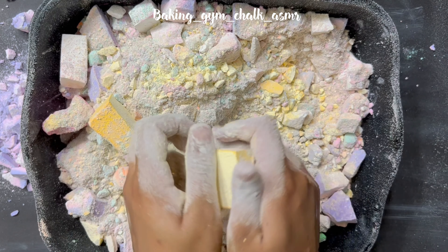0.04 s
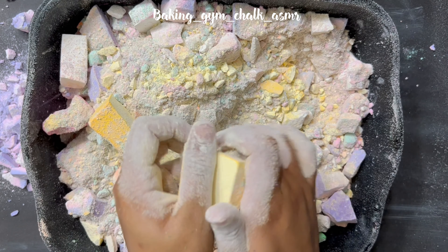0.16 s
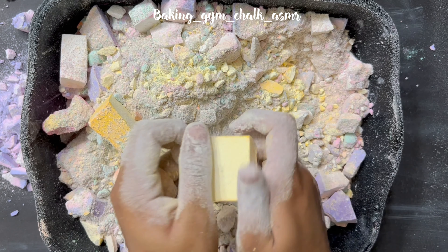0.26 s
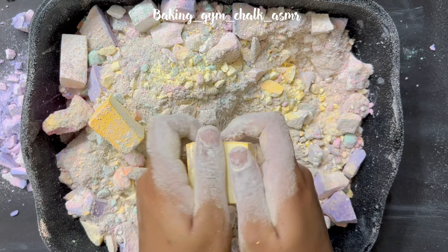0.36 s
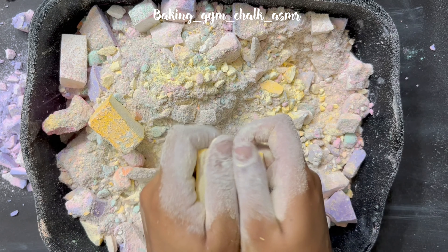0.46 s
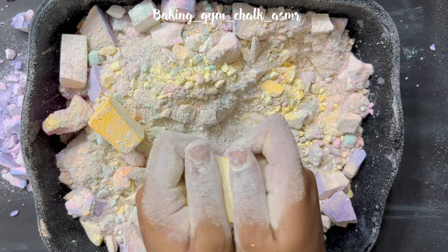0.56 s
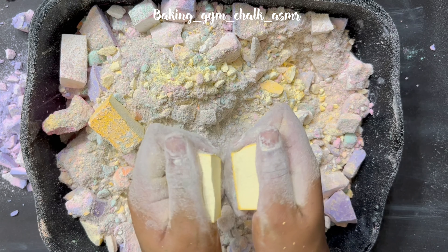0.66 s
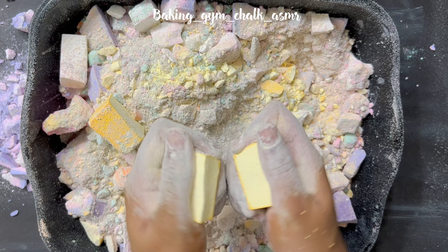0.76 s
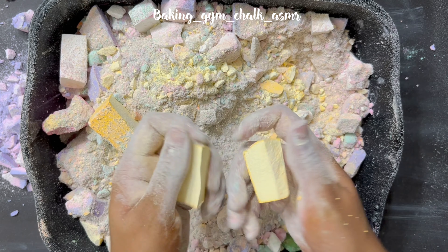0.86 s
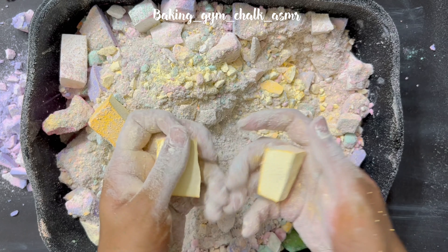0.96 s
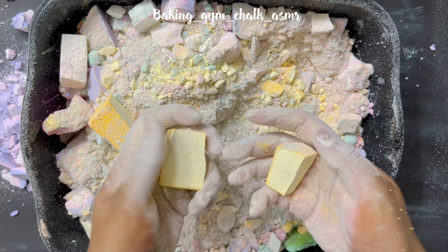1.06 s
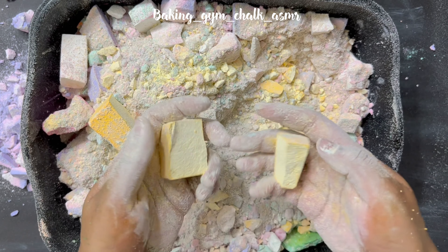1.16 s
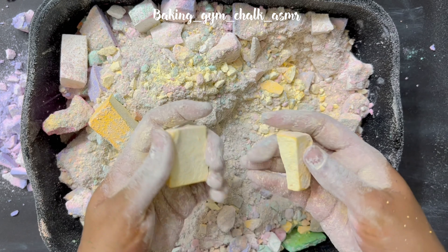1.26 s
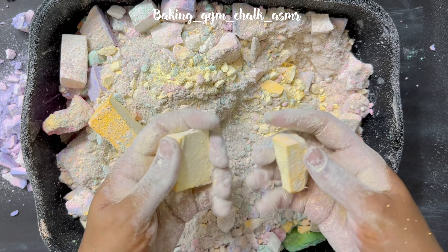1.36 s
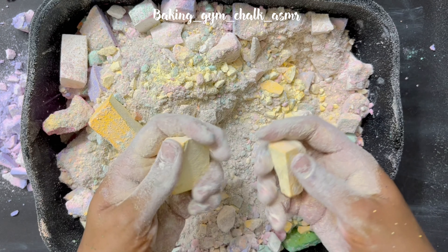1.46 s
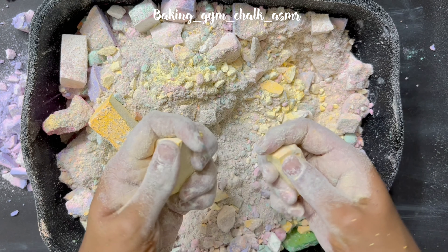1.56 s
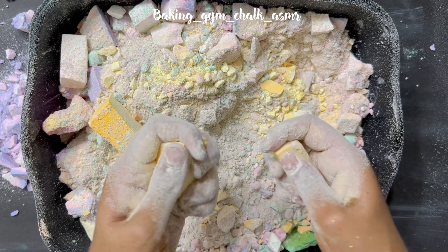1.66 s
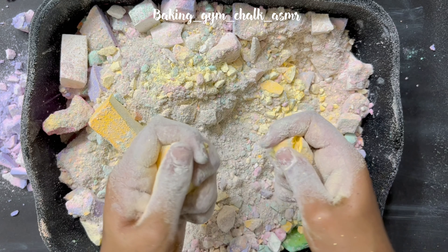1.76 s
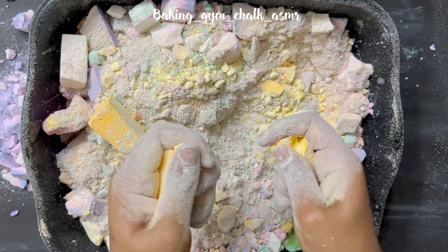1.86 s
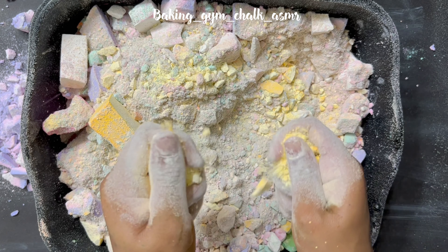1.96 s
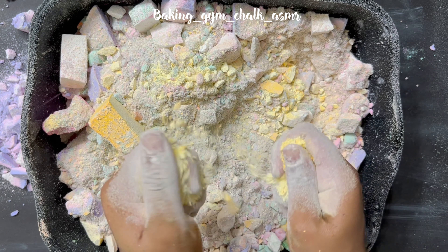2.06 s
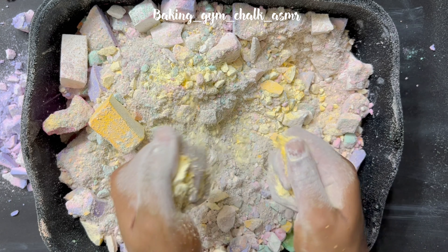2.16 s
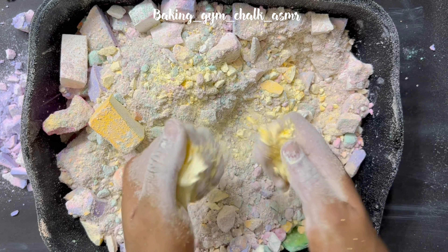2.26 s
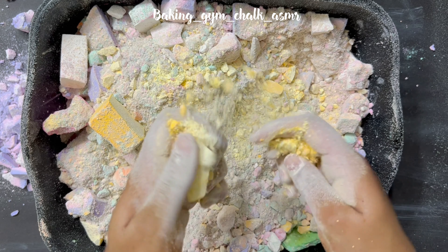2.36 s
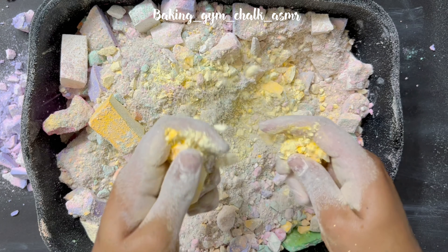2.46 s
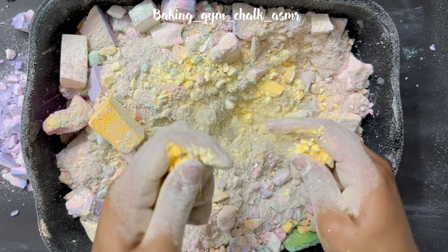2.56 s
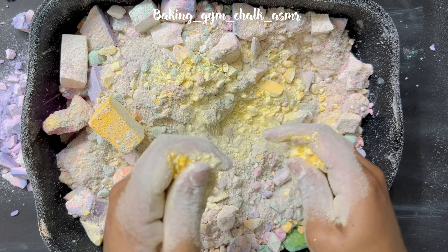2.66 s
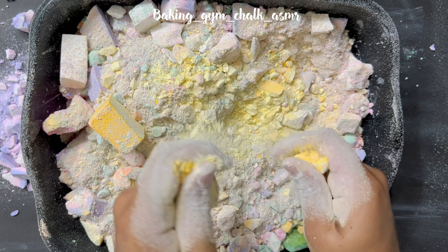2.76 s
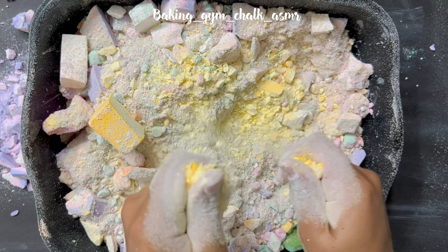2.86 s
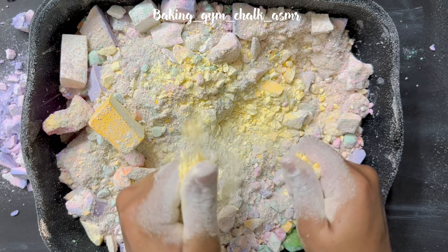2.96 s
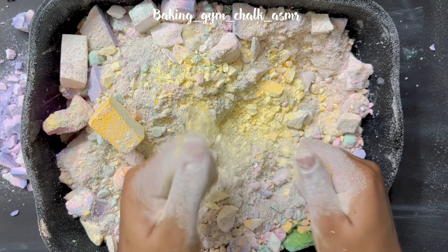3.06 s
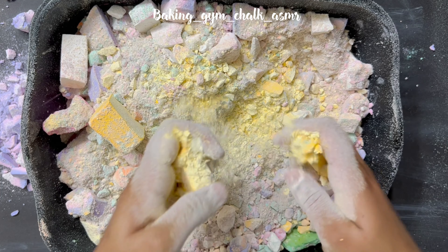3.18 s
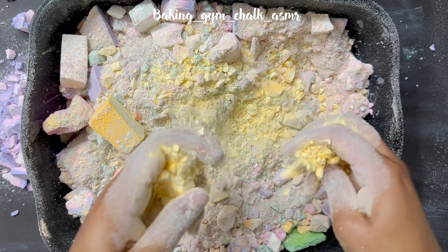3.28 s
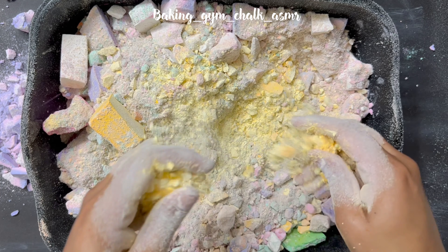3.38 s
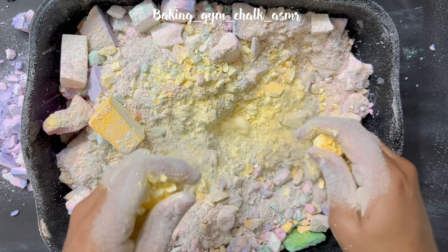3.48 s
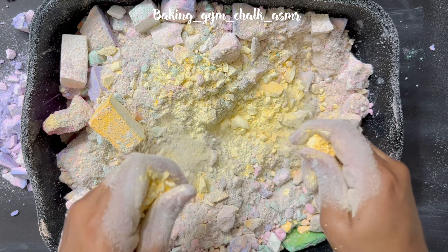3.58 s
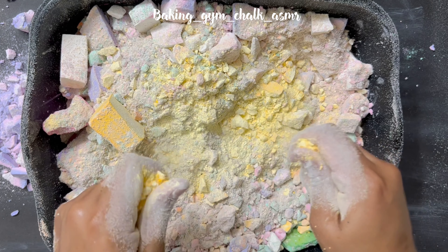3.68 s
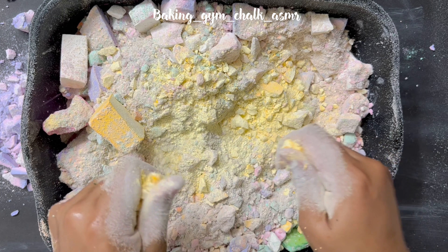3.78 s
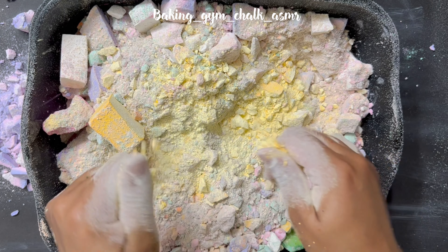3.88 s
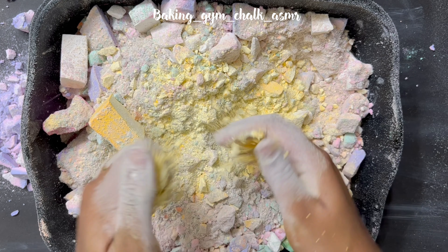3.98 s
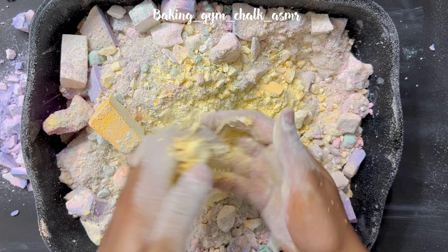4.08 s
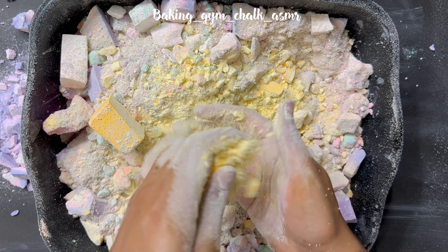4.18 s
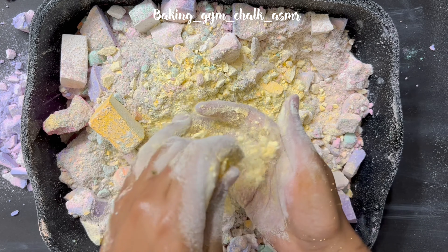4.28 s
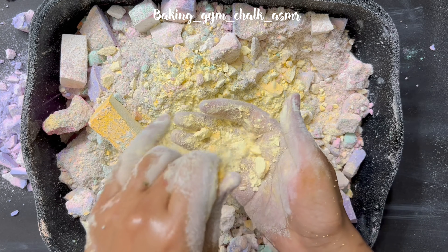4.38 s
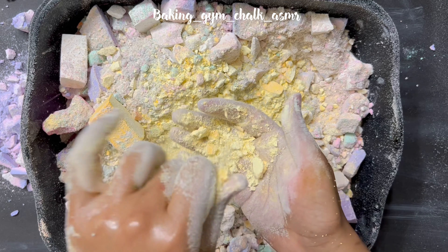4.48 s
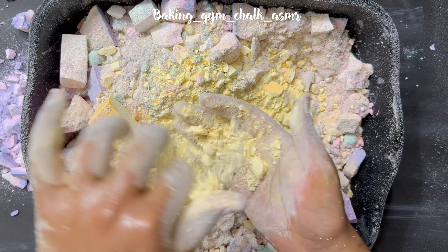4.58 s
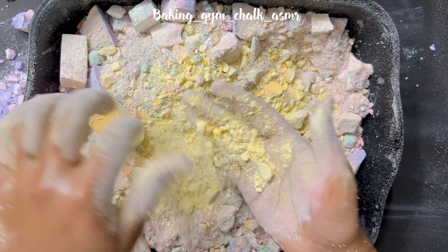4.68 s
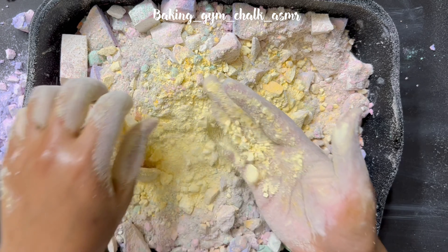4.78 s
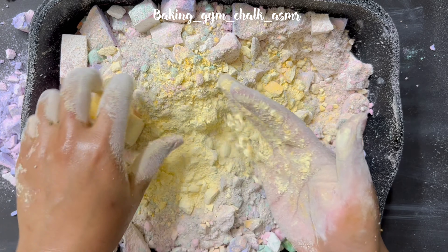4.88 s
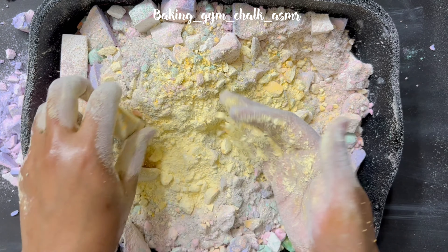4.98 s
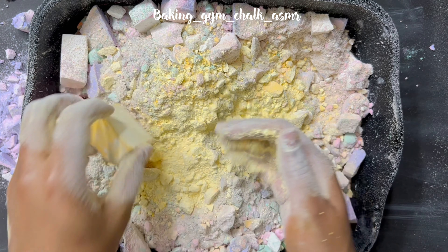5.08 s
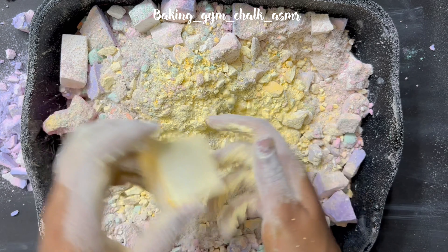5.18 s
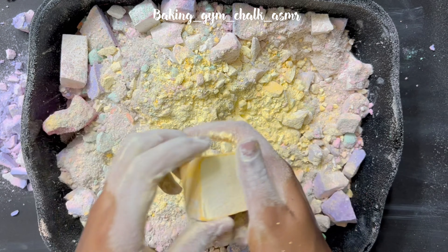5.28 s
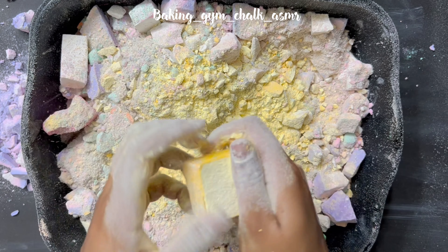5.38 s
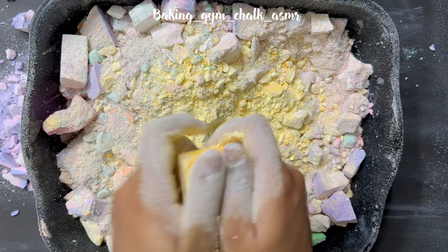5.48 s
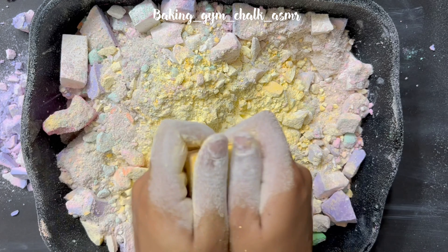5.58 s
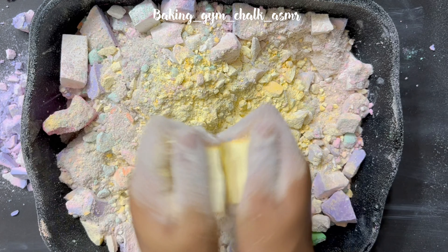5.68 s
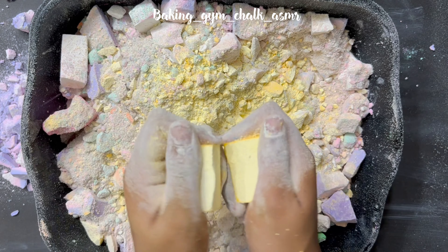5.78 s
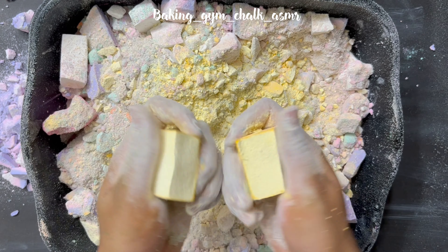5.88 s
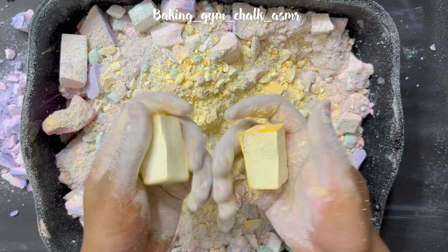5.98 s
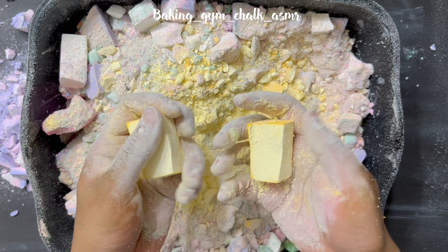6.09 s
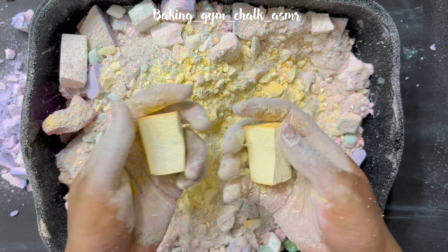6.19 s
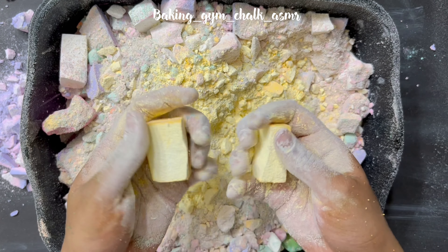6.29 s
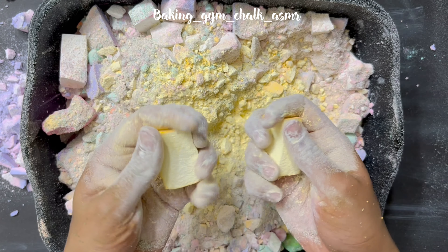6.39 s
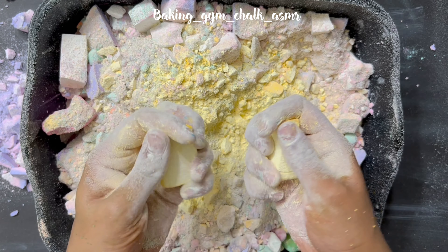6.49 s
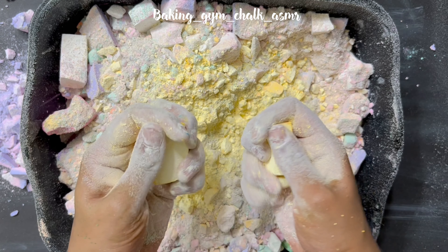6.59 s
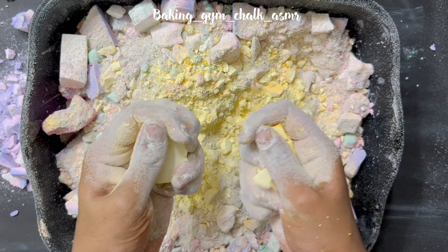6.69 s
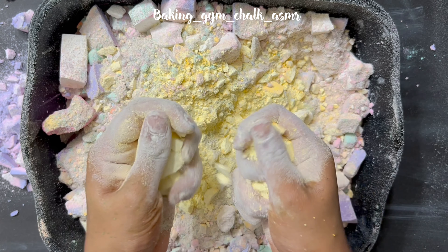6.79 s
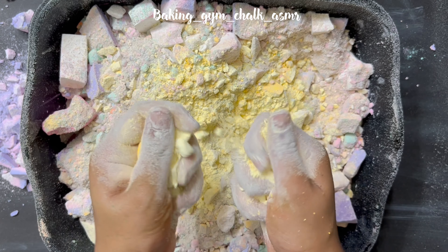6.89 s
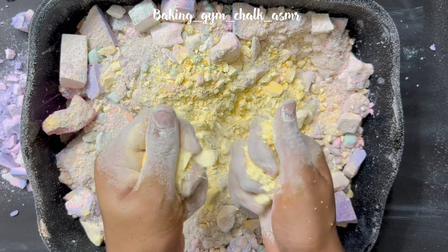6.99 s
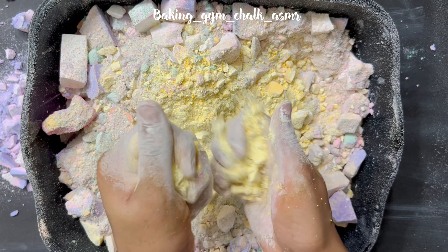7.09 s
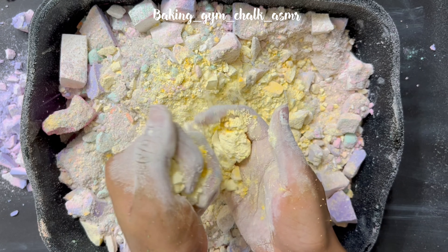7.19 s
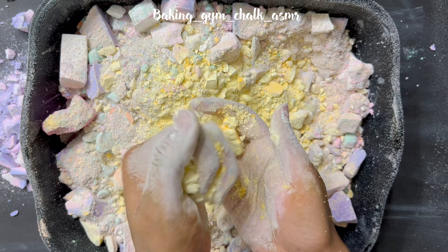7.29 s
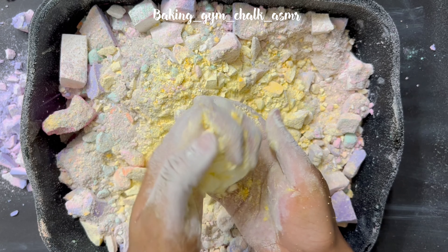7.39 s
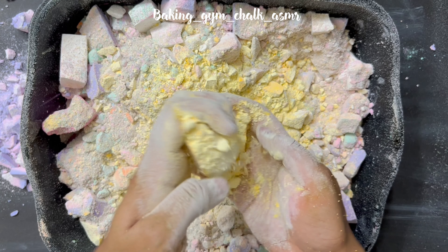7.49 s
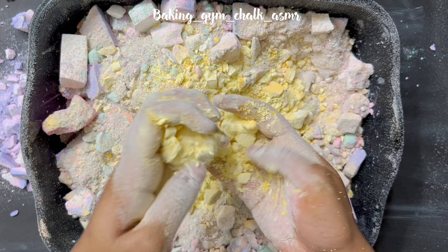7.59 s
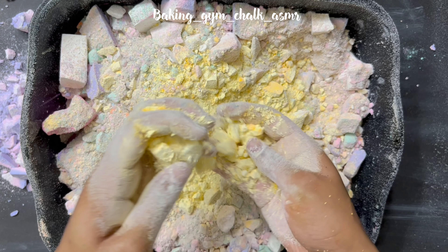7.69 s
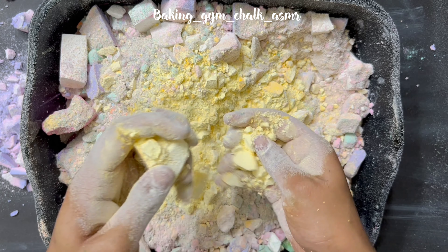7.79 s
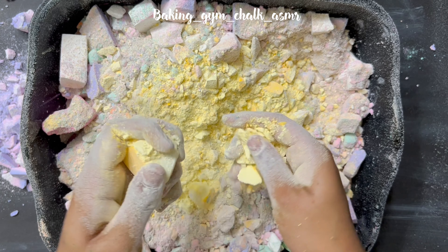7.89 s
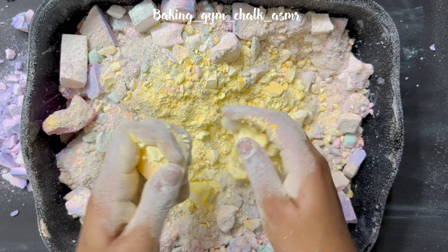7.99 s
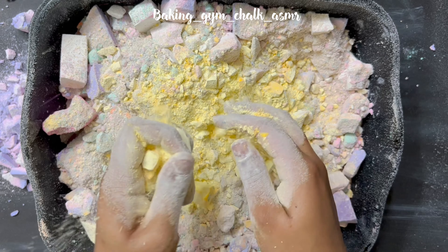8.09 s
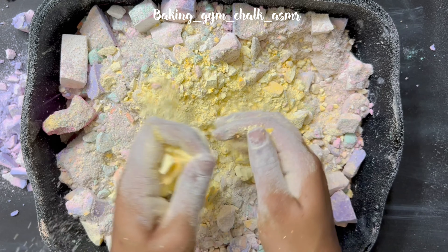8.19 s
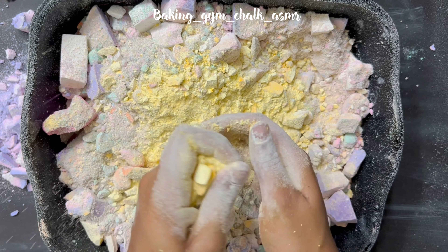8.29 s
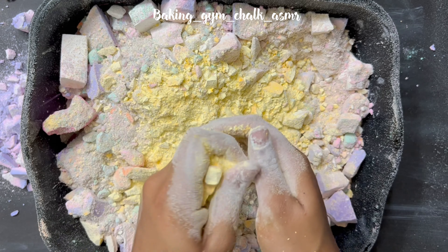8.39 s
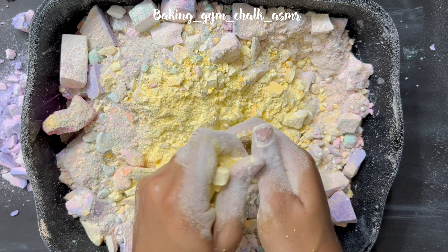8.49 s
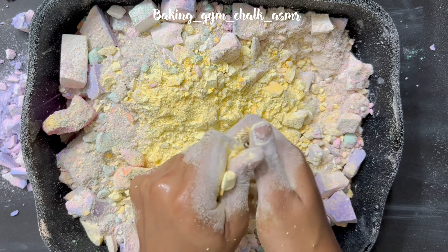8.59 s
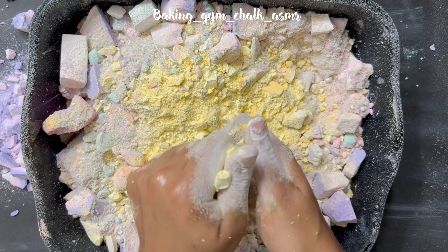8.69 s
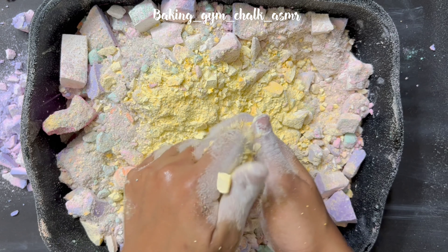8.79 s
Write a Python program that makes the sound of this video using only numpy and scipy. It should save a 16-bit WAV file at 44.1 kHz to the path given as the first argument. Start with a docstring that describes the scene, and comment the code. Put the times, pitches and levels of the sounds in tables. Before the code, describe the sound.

Hard chalk snaps sharply in two, crunches into crisp irregular crackles and powdery crumbs, with whispery rubbing between, very close in a quiet room.

```python
"""Dusty fingers swish over soft chalk, close by in a small room, before one hard snap.
Swishes lead into a dense volley of breaks that thins into crumbs; a lone snap and a second volley
follow, then scattered breaks to the end. Each break is a tick whose lows trail after it.
Noise grains make the crumbs and swishes; a short tail answers over faint hum, rumble and hiss.
The loudest snaps clip."""
import sys
import numpy as np
from scipy import signal
from scipy.fft import rfft, irfft
from scipy.io import wavfile
from scipy.ndimage import uniform_filter1d

SR = 44100
rng = np.random.default_rng(int(sys.argv[2]) if len(sys.argv) > 2 else 0)


def unload_audio(sound):
    """Save the sound as a 16-bit wav file, at the path given as the first command line argument."""
    columns = np.transpose(np.atleast_2d(sound))
    # keep every value between -1 and 1, then stretch to whole-number steps
    steps = np.round(np.clip(columns, -1, 1) * 32767)
    wavfile.write(sys.argv[1], SR, steps.astype(np.int16))


N = 390285  # length in samples


def undb(db):
    """Decibels to gain."""
    return 10 ** (np.asarray(db) / 20)


def unit(x):
    """Scale to rms 1."""
    return x / np.sqrt(np.mean(x ** 2))


def columns(table):
    """Automation curves from a table whose first column is time, one value per sample."""
    s, *cols = np.transpose(table)
    return [np.interp(np.arange(N) / SR, s, c) for c in cols]


def colour(x, gain):
    """Filter with a gain given as a function of frequency."""
    n = x.shape[-1]
    f = np.arange(n // 2 + 1) * SR / n + 1e-3
    return irfft(rfft(x) * gain(f), n)


def points(table):
    """EQ curve through (frequency, level) points on a log-frequency axis."""
    hz, db = np.transpose(table)
    return lambda f: undb(np.interp(np.log(f), np.log(hz), db))


def band(x, lo_hz, hi_hz):
    """Causal band-pass."""
    sos = signal.butter(2, [lo_hz, min(hi_hz, .45 * SR)], "band", fs=SR, output="sos")
    return signal.sosfilt(sos, x)


def walk(rate):
    """Random modulation, rms 1, that glides to a new value rate times a second."""
    k = int(SR / rate)
    steps = np.repeat(rng.standard_normal(N // k + 1), k)
    return unit(uniform_filter1d(steps, k)[:N])


def wide(likeness, size):
    """Stereo noise whose left and right correlate by the given likeness."""
    mid, side = rng.standard_normal((2, size))
    c = np.clip(likeness, -1, 1)
    return np.sqrt((1 + c) / 2) * mid + np.sqrt((1 - c) / 2) * side * np.array([[1], [-1]])


def swells(table):
    """Bell-shaped swells of gain for two layers; the length spans the 1/e points."""
    t, out = np.arange(N) / SR, np.zeros((2, N))
    for s, *db, ms in table:
        near = slice(max(int((s - ms / 500) * SR), 0), int((s + ms / 500) * SR))
        bell = np.exp(-(2000 * (t[near] - s) / ms) ** 2)
        out[:, near] += undb(db)[:, None] * bell
    return out


def crackle(rate, spread_db):
    """Lone clicks at random moments (rate per second), a few much larger than the rest."""
    chance, size, sign = rng.random((3, N))
    return (chance < rate / SR) * undb(-spread_db * np.log(1 - size)) * np.sign(sign - .5)


HISS_DB = -72


def hiss():
    """Microphone hiss: steady, partly shared band-passed noise."""
    return undb(HISS_DB) * unit(band(wide(0.45, size=N), 1500, 15000))


# partials of the hum: (frequency [Hz], relative level [dB])
HUM_PARTIALS = [(65.5, -4.5), (131, 1), (197, -5), (333, -13.5)]


def hum(hum_db):
    """Sine partials sharing one slight pitch waver, each with its own level waver."""
    hum_db = hum_db + 1.7 * walk(6.5)
    turns = np.cumsum(1 + .006 * walk(7.4)) / SR
    tone = 0
    for hz, db in HUM_PARTIALS:
        level = undb(db + 2.0 * walk(14)) * np.sqrt(2)
        tone = tone + level * np.sin(2 * np.pi * hz * turns)
    return undb(hum_db) * tone


RUSTLE_DB = -63.5  # mean level of the low rustle between scuffs
# spectrum behind rumble and rustle: (frequency [Hz], relative level [dB per Hz])
RUMBLE_SPECTRUM = [(12, -27), (20, -5), (132, -5), (236, -16.5), (270, -11.5), (315, -21), (396, -15.5),
                   (509, -19.5), (908, -25), (2000, -36.5), (2600, -62), (4400, -120)]
# low bumps and scuffs of hands and lumps in the tub:
# (centre time [s], rumble level [dB], rustle level [dB], length [ms])
TUB_SCUFFS = [(.42, -57.5, -61, 110), (.63, -55, -51, 100), (1.76, -60.5, -53.5, 69), (1.9, -54.5, -63, 70),
              (2.32, -56, -59, 39), (2.63, -57, -66, 67), (2.72, -53, -37, 17), (2.81, -58, -52, 55),
              (3.49, -65, -38, 25), (3.57, -56.5, -58, 80), (4.86, -61.5, -48, 64), (4.96, -60, -57.5, 84),
              (5.03, -51.5, -64, 50), (5.49, -47, -71, 63), (5.7, -41.5, -47, 72), (6.72, -56, -49, 54),
              (7.02, -58, -70, 60), (8.04, -54, -48, 31), (8.18, -61, -66, 84)]


def rumble_and_rustle(rumble_db):
    """Low-passed noise under a wide low rustle; bumps and scuffs in the tub swell both."""
    rumble_db = rumble_db + 2.2 * walk(6)
    rustle_db = RUSTLE_DB + 1.9 * walk(6.3)
    bump, scuff = swells(TUB_SCUFFS)
    low_pass = signal.butter(2, 170, fs=SR, output="sos")
    rumble = signal.sosfilt(low_pass, colour(wide(0.93, size=N), points(RUMBLE_SPECTRUM)))
    # a shared core plus a broader, almost unrelated left and right
    rustle = band(wide(1.0, size=N), 230, 540) + band(wide(0.05, size=N), 190, 2500)
    rustle = colour(rustle, points(RUMBLE_SPECTRUM))
    return (undb(rumble_db) + bump) * unit(rumble) + (undb(rustle_db) + scuff) * unit(rustle)


# background automation before its random waver: (time [s], rumble level [dB], hum level [dB])
BACKGROUND_LEVELS = [(0.0, -61.5, -63.5), (0.27, -57, -63), (0.71, -57, -55.5), (1.26, -60.5, -63),
                     (3.52, -56.5, -56), (3.77, -62, -66), (4.34, -72, -68.5), (5.0, -57, -58.5),
                     (5.35, -65, -67.5), (5.72, -55, -56.5), (5.99, -53, -59), (6.43, -66, -62.5),
                     (6.7, -55, -56.5), (7.15, -58, -54.5), (7.69, -70, -70), (8.09, -65.5, -63.5),
                     (8.23, -68, -72), (8.85, -68, -60)]


def background():
    """Sum of rumble, rustle, hum and hiss, the bed under the hands."""
    rumble_db, hum_db = columns(BACKGROUND_LEVELS)
    return rumble_and_rustle(rumble_db) + hum(hum_db) + hiss()


TAIL_DB = -10.5  # trim on the whole tail
# room tail by octave band:
# (centre [Hz], decay by 60 dB [s], relative level [dB], left-right likeness [0-1])
ROOM_BANDS = [(122.1, 0.074, -25, 1), (307, 0.26, -37.5, .9), (536, 0.34, -39, 0.7),
              (1000, 0.41, -42.5, 0.17), (1990, 0.38, -39.5, 0.9), (3950, 0.26, -31.5, 1),
              (8600, 0.24, -29.5, 0), (14300, 0.25, -52.5, 0.7)]


def room(x):
    """Dense echoes that build up within about a millisecond and die band by band."""
    t = np.arange(SR // 2) / SR
    tail = 0
    for hz, t60, db, likeness in ROOM_BANDS:
        noise = unit(band(wide(likeness, size=len(t)), hz / np.sqrt(2), hz * np.sqrt(2)))
        tail = tail + undb(db - 60 * t / t60) * noise
    tail = undb(TAIL_DB) * tail * (1 - np.exp(-(t / 0.00067) ** 2))
    return signal.fftconvolve(x.mean(axis=0, keepdims=True), tail, axes=1)[:, :N]


# whispering bands of skin on chalk: (centre [Hz], width [Hz], mean relative level [dB])
WHISPER_BANDS = [(5200, 700, -5), (6500, 700, -4), (7400, 600, -5), (9200, 900, -1), (11700, 1300, 0),
                 (14600, 1600, -3)]


def rubbing(dust_gain, whisper_gain):
    """Dusty skin on chalk: fine grit, and whispering bands that come and go on their own."""
    whisper = 0
    for hz, width, db in WHISPER_BANDS:
        noise = unit(band(wide(0.14, size=N), hz - width / 2, hz + width / 2))
        whisper = whisper + undb(db + 3.5 * walk(16)) * noise
    grit = undb(1.2 * walk(30)) * wide(0.17, size=N) + 0.21 * unit(crackle(900, 2.6))
    grit = unit(band(grit, 3600, 20000))
    return (dust_gain + 0.09 * whisper_gain) * grit + whisper_gain * unit(whisper)


SAND_SHARE = .4  # hiss that comes with the crumbs
# crumb sizes, coarse to fine: one band centre [Hz] each
GRAIN_HZ = [700, 1300, 2300, 4000, 7000, 11000]
# spectrum of crumbs and sand: (frequency [Hz], relative level [dB per Hz])
CRUMB_SPECTRUM = [(120, -57.5), (200, -6), (375, -1.5), (664, -5), (799, -5), (1500, -2), (8810, -9.5),
                  (15600, -30.5), (16500, -24.5)]


def crumbling(crumb_gain, sand_gain):
    """Crumbs of every size break and drop on the heap, each size in its band, over sandy hiss."""
    clicks = 0
    for hz in GRAIN_HZ:
        clicks = clicks + unit(band(crackle(500, 3.0), hz / 1.81, hz * 1.6)) * np.sqrt(hz)
    clicks = unit(colour(clicks, points(CRUMB_SPECTRUM)))
    sand = undb(2.1 * walk(53)) * wide(0.24, size=N)
    sand = unit(colour(sand, points(CRUMB_SPECTRUM)))
    crumb_gain = crumb_gain * undb(3.5 * walk(22))  # crumbs come in clusters
    return crumb_gain * clicks + (SAND_SHARE * crumb_gain + sand_gain) * sand


def shed(peak_db, t60):
    """Gain that jumps at every listed fracture and dies away by 60 dB in t60 seconds."""
    kicks = np.zeros(N)
    kicks[(np.array(FRACTURES)[:, 0] * SR).astype(int)] = undb(peak_db)
    return signal.lfilter([1], [1, -undb(-60 / t60 / SR)], kicks)


SHOWER_DB, SHOWER_T60_S = -39, 0.24  # crumbs shed after a break, against its level
DUST_DB, DUST_T60_S = -30.5, 0.18  # dust shed after a tick, against its level
# steady hand work: (time [s], crumbling level [dB], rubbing level [dB])
HAND_LEVELS = [(0.0, -74, -62), (0.44, -69.5, -76), (0.71, -58, -66), (1.03, -72.5, -60),
               (1.62, -75, -72.5), (1.9, -49, -51), (2.27, -58.5, -69), (2.39, -80, -59),
               (2.69, -50.5, -52), (2.86, -50, -51), (3.1, -58, -66), (3.7, -55.5, -59), (4.78, -66, -75.5),
               (5.23, -75.5, -74), (5.92, -63.5, -68.5), (6.56, -73.5, -72), (6.68, -65, -45),
               (6.75, -45.5, -45), (7.49, -65, -73), (8.04, -62, -67), (8.18, -66.5, -60), (8.85, -59, -62)]
# finger swishes: (centre time [s], whisper level [dB], sandy level [dB], length [ms])
FINGER_SWISHES = [(.07, -56, -71, 110), (.218, -52.5, -73.5, 51), (0.317, -50.5, -73.5, 28),
                  (0.5, -55.5, -59, 46), (0.964, -70, -83, 260), (1.03, -83, -94.5, 21),
                  (1.203, -54, -67, 43), (1.276, -53, -83, 28), (1.326, -64, -86, 18),
                  (1.424, -55, -66, 41), (1.598, -83, -61, 34), (2.39, -52, -48, 64), (2.446, -45, -56, 14),
                  (3.807, -52, -52, 23), (4.111, -59, -70, 21), (4.525, -46.5, -51, 65),
                  (4.67, -62, -50.5, 30), (4.848, -83, -61.5, 56), (4.985, -77.5, -62, 90),
                  (5.136, -67, -88, 67), (5.315, -49.5, -56.5, 50), (5.533, -62, -72.5, 40),
                  (5.891, -67, -53, 23), (6.007, -54, -73, 77), (6.089, -55, -88, 22),
                  (6.149, -52.5, -60, 46), (6.265, -47, -65, 26), (7.29, -54, -50, 71),
                  (7.48, -54.5, -76, 40), (7.744, -52, -56.5, 100), (8.793, -57, -49, 19)]


def hand_work():
    """Rubbing and crumbling under steady levels, swishes and debris; also the crumbling curve."""
    crumb_db, rub_db = columns(HAND_LEVELS)
    whisper, sandy = swells(FINGER_SWISHES)
    *_, break_db, tick_db = np.transpose(FRACTURES)
    crumbs = undb(crumb_db) + shed(break_db + SHOWER_DB, SHOWER_T60_S)
    dust = undb(rub_db) + shed(tick_db + DUST_DB, DUST_T60_S)
    return crumbling(crumbs, sandy) + rubbing(dust, whisper), crumb_db


CHIP_DB, CHIP_SPREAD_DB = 7, 3.0  # least level over the crumbling, upward scatter
CHIP_HZ = (915, 4200)  # ring range
CHIP_CROWDING = .8  # chips per second grow with this power of the crumbling


def chips(crumb_db, count):
    """Small stray fractures that crowd where crumbling is strong; rows as in FRACTURES."""
    when, pitch, size, bright = rng.random((count, 4)).T
    busy = np.cumsum(undb(CHIP_CROWDING * crumb_db))
    i = np.searchsorted(busy, when * busy[-1])
    db = crumb_db[i] + CHIP_DB - CHIP_SPREAD_DB * np.log(1 - .95 * size)
    hz = CHIP_HZ[0] * (CHIP_HZ[1] / CHIP_HZ[0]) ** pitch
    return np.transpose([i / SR, hz, db, db + 24 * (bright - .8)])


SNAP_DB, RING_DB = -0.5, -4  # parts of every break, against its level
# thud against the break for a piece that rings at 1 kHz; smaller pieces thud less
THUD_DB, THUD_DB_PER_OCTAVE = -11.5, -7
# the ring beams upward out of the cupped hands; the walls get less of it
RING_Q, RING_FAR_DB = 3.5, -13
# lateness at 1 kHz for a 0 dB ring: bending waves in the block carry the treble faster
TRAIL_S = 0.0017
BOUNCE_S, BOUNCE_DB = 0.001043, -14.5  # echo off the heap below the hands, mean delay
# bands of thud, snap and tick: (low edge [Hz], high edge [Hz])
PARTS_HZ = [(260, 740), (900, 3680), (4800, 11000)]
# block modes in every snap: (centre [Hz], width [Hz], boost level [dB])
BLOCK_MODES = [(650, 84, -3.5), (1260, 92, 2.5), (2160, 1000, -1), (3093, 250, -2)]


def cracks(rows):
    """Sharp breaks whose lows trail the treble, with a brief ring; returns near and wall feeds."""
    n, lead = 2048, 128  # samples per break, samples kept ahead of it
    f = np.arange(n // 2 + 1) * SR / n + 1e-3
    thud, snap, tick = (1 / np.sqrt((1 + (lo / f) ** 6) * (1 + (f / hi) ** 6)) for lo, hi in PARTS_HZ)
    snap = snap * (1 + sum(undb(db) / (1 + (2 * (f - hz) / w) ** 2) for hz, w, db in BLOCK_MODES))
    # fade in over 0.84 ms up to the break
    start = np.clip((np.arange(n) - lead) / SR / 0.00084 + 1, 0, 1) ** 2
    out = np.zeros((2, N + n))
    # smooth random phase makes every break ragged in its own way
    ragged = rng.standard_normal((len(rows), len(f)))
    ragged = 9.3 * uniform_filter1d(uniform_filter1d(ragged, size=40, axis=1), size=40, axis=1)
    scatter = rng.standard_normal(len(rows))
    for (s, hz, db, tick_db), twist, late in zip(rows, ragged, scatter):
        snap_db, ring_db = db + SNAP_DB, db + RING_DB
        thud_db = db + THUD_DB + THUD_DB_PER_OCTAVE * np.log2(hz / 1000)
        # bigger breaks run through more chalk, so they spread out longer
        delay = TRAIL_S * undb(.12 * ring_db) * (1000 / np.maximum(f, 250)) ** .8
        bounce_s = BOUNCE_S * (1 + 0.12 * late)
        bounce = 1 + undb(BOUNCE_DB) * np.exp(-2j * np.pi * f * bounce_s)
        # summing delay over frequency gives the phase of the trail
        trail = 2 * np.pi * np.cumsum(delay + lead / SR) * SR / n
        wave = bounce * np.exp(1j * (twist - trail))
        mode = 1 / (1 + 1j * RING_Q * (f / hz - hz / f))
        parts = start * irfft(wave * [thud, mode * np.abs(mode), snap, tick], n)
        part_db = [[thud_db, ring_db + far, snap_db, tick_db] for far in (0, RING_FAR_DB)]
        i = max(int(s * SR) - lead, 0)
        out[:, i:i + n] += (undb(part_db) / np.abs(parts).max(axis=1)) @ parts
    return out[:, :N]


# fractures: (time [s], ring [Hz], break level [dB], tick peak level [dB])
FRACTURES = [(.3271, 690, -50, -35.5), (.602, 1370, 4.5, -3), (1.5895, 3760, -52, -25),
             (1.677, 3260, -37.5, -26), (1.685, 3250, -36, -33), (1.694, 3130, -42, -30.5),
             (1.7158, 3240, -25.5, -24.5), (1.7361, 3060, -10, -17.5), (1.7473, 1327, -9, -6),
             (1.7497, 4300, -7.5, -15), (1.8182, 1490, -15.5, -39), (1.8795, 1350, -11, -2),
             (1.8827, 1300, -7.5, -18.5), (1.9184, 4370, -20.5, -11), (1.9263, 2030, -11.5, -6),
             (1.9413, 2300, -19.5, -18), (1.9701, 2400, -17, -30), (1.975, 2330, -28, -27),
             (1.9957, 1520, -19, -24), (2.0316, 2670, -40, -22), (2.051, 2920, -38, -24),
             (2.104, 1195, -30, -25), (2.1648, 1680, -28.5, -34), (2.1679, 1540, -28.5, -49),
             (2.191, 2320, -50, -29.5), (2.4383, 3330, -36.5, -40), (2.4546, 1450, -26, -27),
             (2.4974, 3050, -17, -22.5), (2.5357, 1490, -28, -31), (2.5638, 2420, -32.5, -56),
             (2.6273, 4330, -36.5, -13), (2.6629, 1970, -36, -28), (2.7028, 1750, -4.5, -12.5),
             (2.7092, 1280, -20, -18), (2.8229, 5000, -19.5, -18), (2.8868, 1460, -24.5, -21.5),
             (2.9323, 2920, -26.5, -32), (2.9898, 2900, -19, -24), (3.076, 4670, -45.5, -30),
             (3.096, 1140, -41, -31), (3.39, 1120, -39, -50), (3.4241, 1690, -17, -32),
             (3.434, 1360, -28, -24.5), (3.45, 2750, -38, -31), (3.4809, 690, -24.5, -36),
             (3.4984, 4750, -29, -19.5), (3.5255, 3930, -13.5, -21.5), (3.5663, 2450, -39, -25),
             (3.587, 3750, -17.5, -12), (3.5962, 4530, -23, -21), (3.662, 800, -33.5, -22.5),
             (3.7745, 2900, -31.5, -24.5), (3.8122, 4000, -42, -24.5), (3.9568, 940, -30.5, -45),
             (3.9651, 900, -39, -34), (4.0352, 3290, -43, -37), (4.097, 2710, -42, -40),
             (4.214, 4600, -48.5, -29.5), (4.2758, 1330, -42, -39), (4.3141, 1260, -34, -36),
             (4.3414, 1290, -29, -23), (4.3498, 1280, -35, -34), (4.3987, 1640, -35.5, -36.5),
             (4.545, 1070, -38, -41.5), (4.6711, 1780, -44.5, -32), (4.7108, 3000, -41, -38),
             (4.729, 1635, -43.5, -35.5), (4.778, 3310, -52, -40), (4.8844, 910, -43, -61),
             (4.929, 2920, -44, -44.5), (5.036, 2960, -49.5, -59), (5.067, 1210, -51, -63.5),
             (5.667, 1280, 4, -13.5), (6.257, 3800, -56.5, -34.5), (6.5102, 1270, -13, -24.5),
             (6.531, 1477, -35, -48), (6.5483, 950, -29, -22.5), (6.601, 2770, -5, -2),
             (6.6048, 1430, -5, -12), (6.6125, 2520, -16, -28), (6.622, 1530, -15, -13.5),
             (6.6398, 1480, -24, -15), (6.7039, 1290, -6, -7), (6.715, 3000, -28.5, -17),
             (6.723, 1380, -1.5, -11), (6.7674, 1330, -14.5, -27), (6.7774, 3180, -24, -26),
             (6.798, 1230, -19, -36), (6.8155, 2870, -9.5, -7), (6.8208, 3000, -21, -11.5),
             (6.8318, 2310, -17, -20.5), (6.844, 1660, -20.5, -37), (6.883, 3120, -39, -22),
             (6.9023, 1180, -24.5, -20.5), (6.9253, 2880, -17.5, -14.5), (7.01, 2520, -42.5, -27.5),
             (7.063, 3290, -44.5, -30), (7.0753, 1340, -31.5, -23), (7.0917, 1410, -35, -49.5),
             (7.1183, 2100, -5, -21.5), (7.139, 1660, -29.5, -36), (7.282, 1830, -34, -36),
             (7.2875, 2320, -33, -30), (7.3933, 4700, -37, -37.5), (7.4146, 4220, -35.5, -43),
             (7.6057, 1610, -38, -55), (7.6085, 1850, -39, -54), (7.788, 2770, -37, -24.5),
             (7.8231, 870, -31, -44), (7.8653, 1910, -43, -44), (7.879, 4600, -27.5, -17),
             (7.9854, 2040, -35, -57), (8.0052, 1910, -32, -47), (8.0163, 4370, -18.5, -13.5),
             (8.0353, 1385, -8, -4), (8.1973, 4300, -34.5, -52), (8.392, 3000, -15, -12.5),
             (8.5656, 1420, -13.5, -13), (8.58, 1460, -22, -21.5), (8.6081, 3070, -30, -25),
             (8.714, 1810, -35.5, -31.5), (8.793, 3350, -35.5, -42.5)]


def fractures(crumb_db):
    """The listed breaks of the chalk blocks together with random stray chips."""
    return cracks(np.vstack([FRACTURES, chips(crumb_db, count=160)]))


PORT_LAG_S = 1.8e-5  # the left port hears the hands a little later


def scene():
    """The hands at the two ports, their echo off the room and the background."""
    soft, crumb_db = hand_work()
    near, far = fractures(crumb_db)
    left = colour(near + soft[0], lambda f: np.exp(-2j * np.pi * f * PORT_LAG_S))
    direct = np.array([left, near + soft[1]])
    return direct + room(far + soft) + background()


TOP_HZ = 16300


def record(dry):
    """The converter clips the loudest snaps; a steep low-pass cuts the top."""
    cut = signal.ellip(8, .2, 50, TOP_HZ, fs=SR, output="sos")
    return np.clip(signal.sosfilt(cut, np.clip(dry, -1, 1)), -1, 1)


dry = scene()
out = record(dry)
unload_audio(out)
```